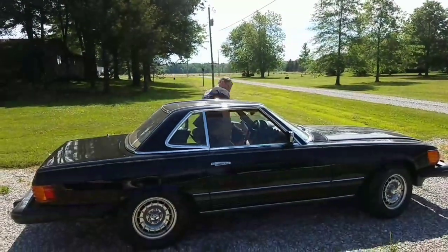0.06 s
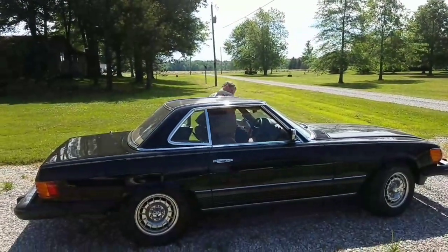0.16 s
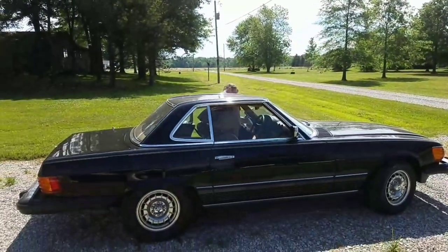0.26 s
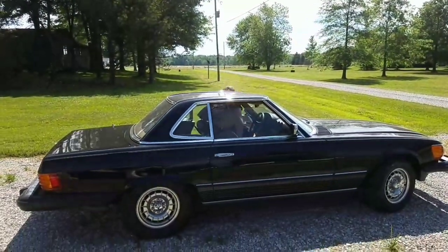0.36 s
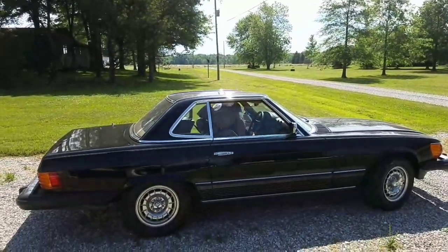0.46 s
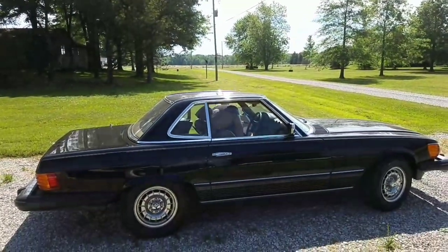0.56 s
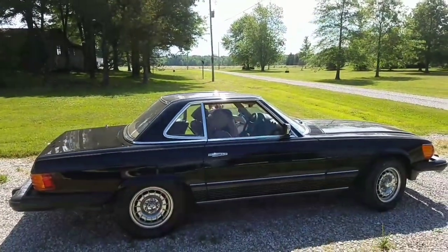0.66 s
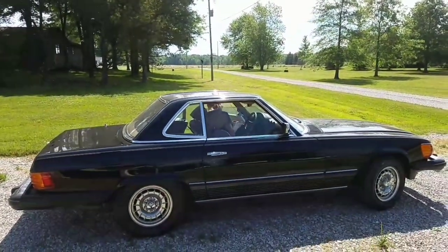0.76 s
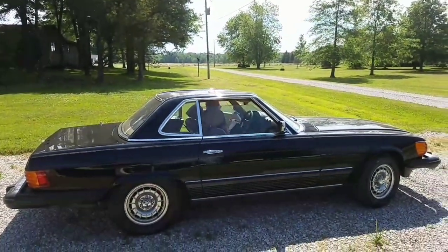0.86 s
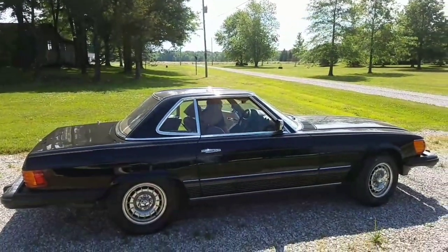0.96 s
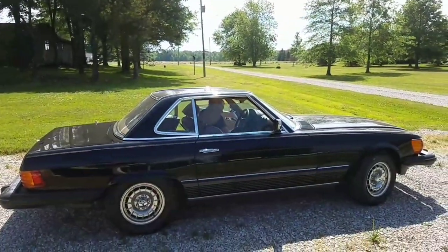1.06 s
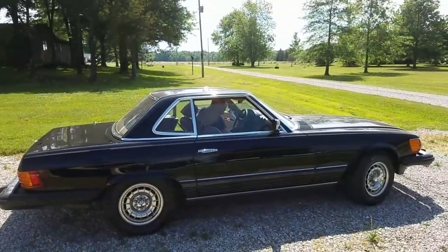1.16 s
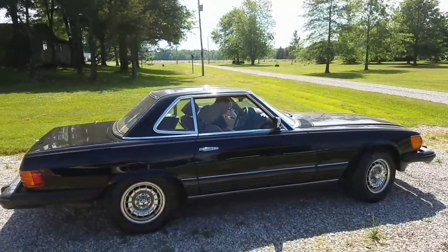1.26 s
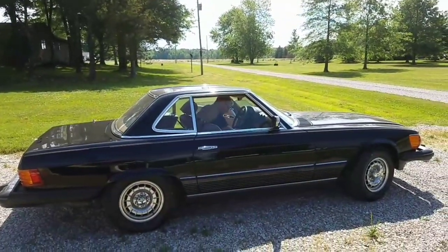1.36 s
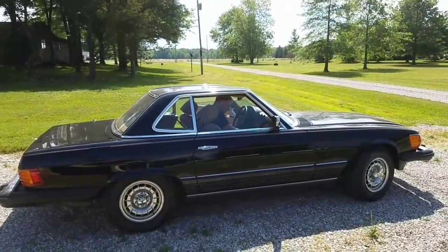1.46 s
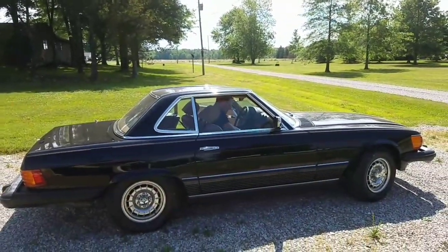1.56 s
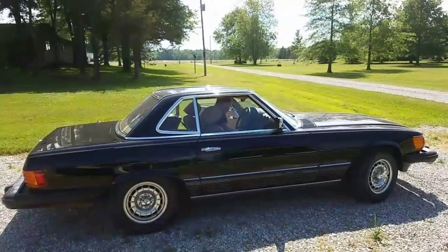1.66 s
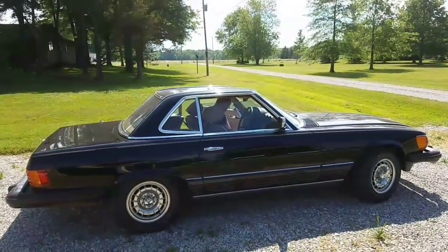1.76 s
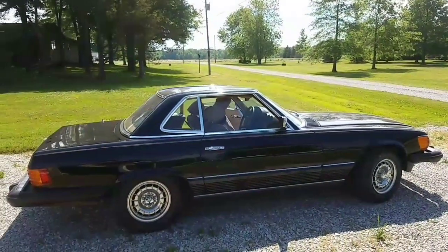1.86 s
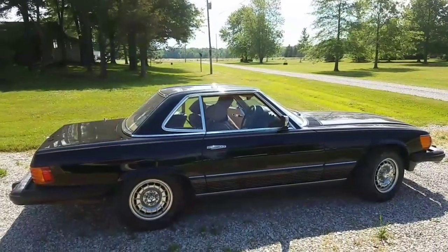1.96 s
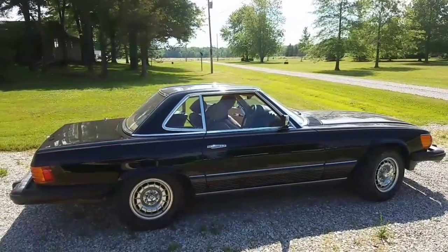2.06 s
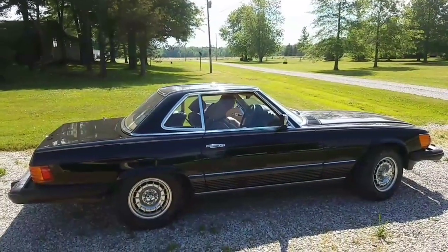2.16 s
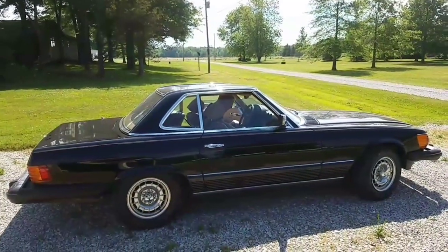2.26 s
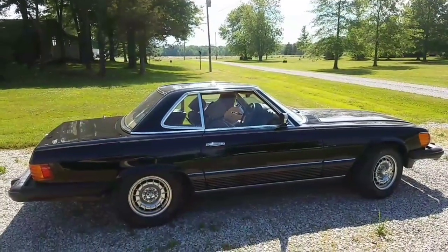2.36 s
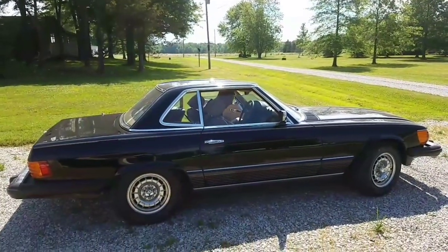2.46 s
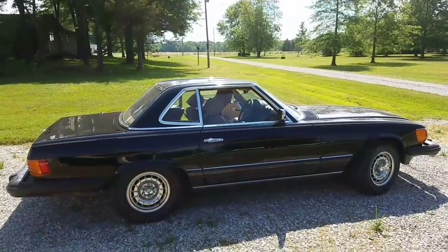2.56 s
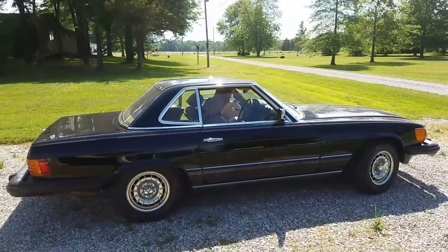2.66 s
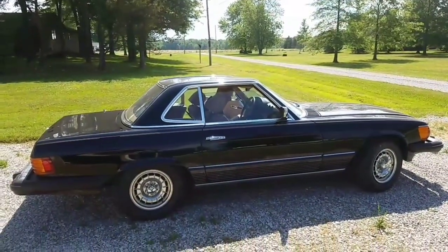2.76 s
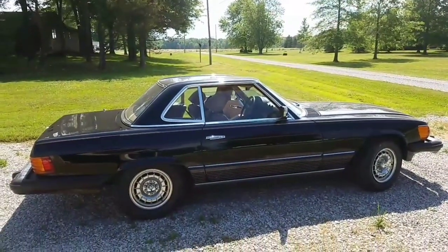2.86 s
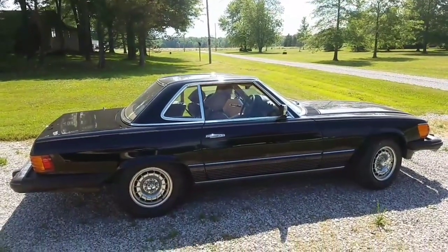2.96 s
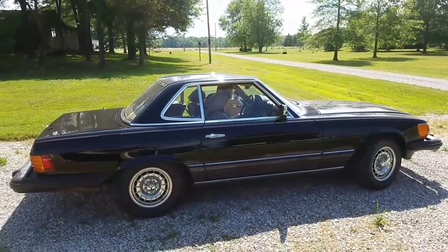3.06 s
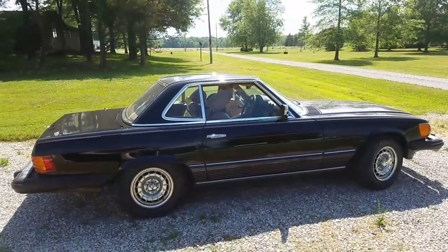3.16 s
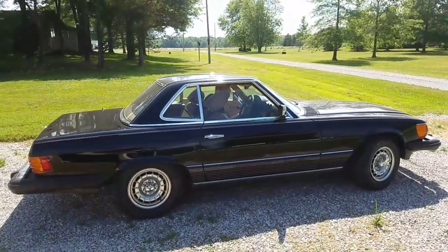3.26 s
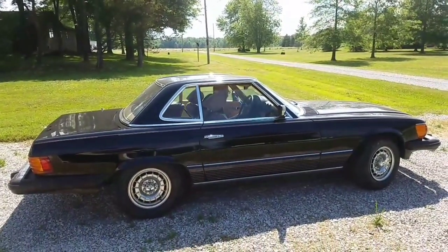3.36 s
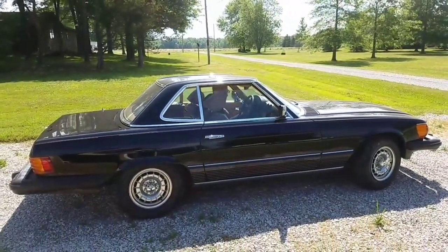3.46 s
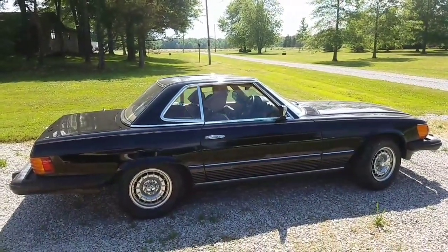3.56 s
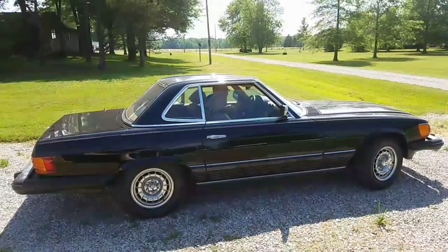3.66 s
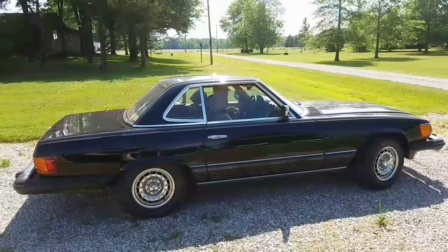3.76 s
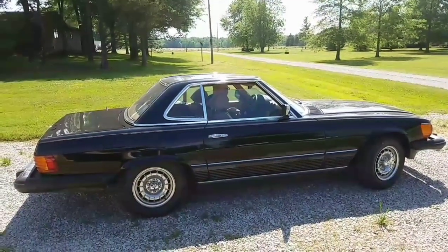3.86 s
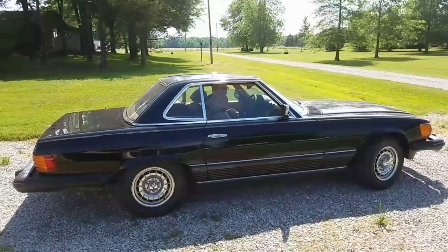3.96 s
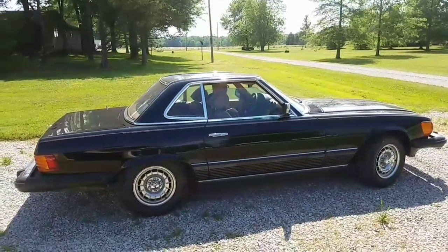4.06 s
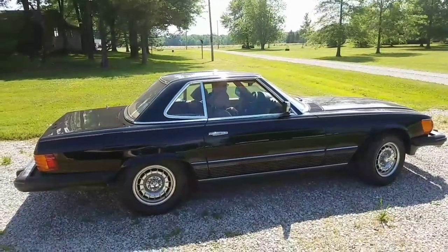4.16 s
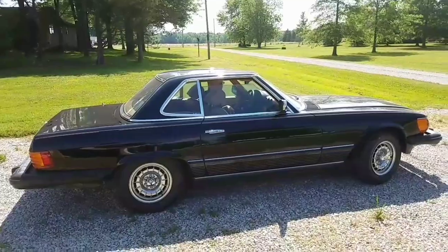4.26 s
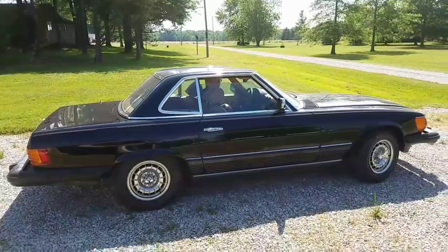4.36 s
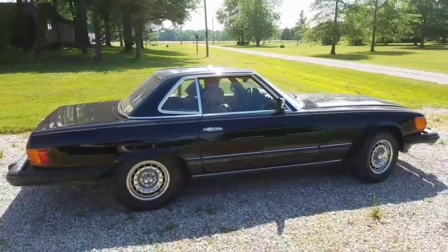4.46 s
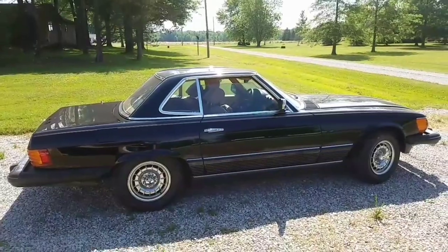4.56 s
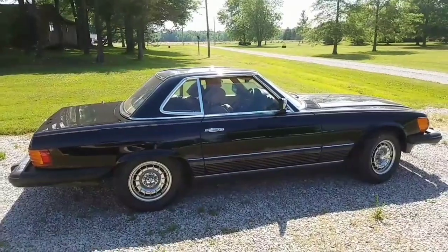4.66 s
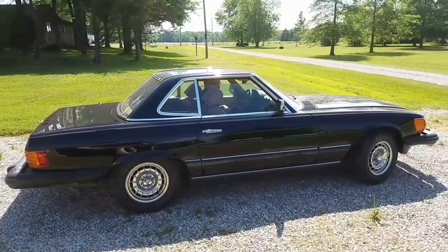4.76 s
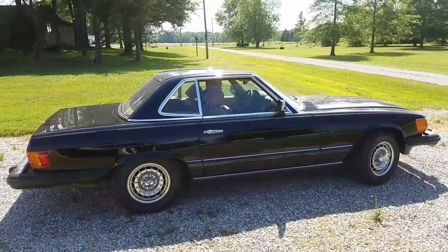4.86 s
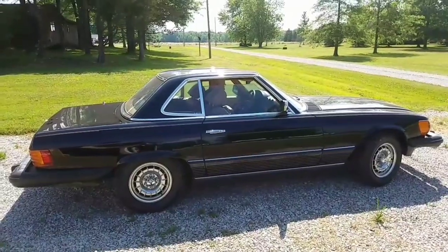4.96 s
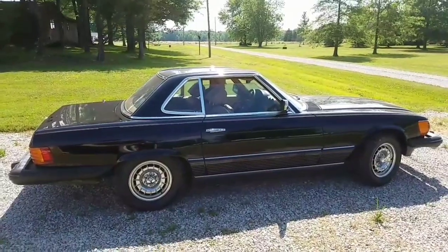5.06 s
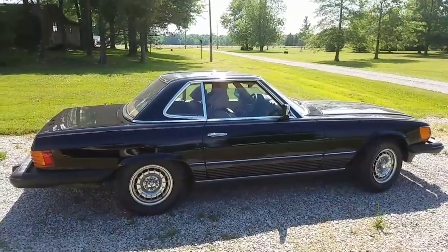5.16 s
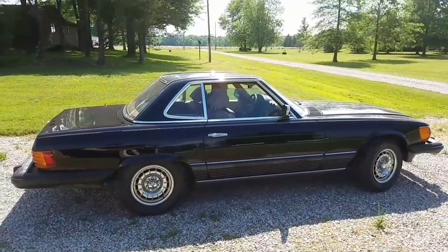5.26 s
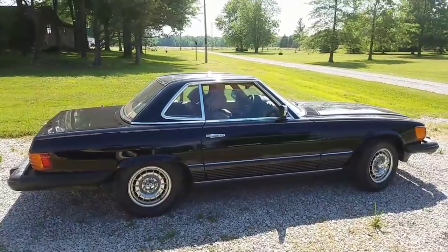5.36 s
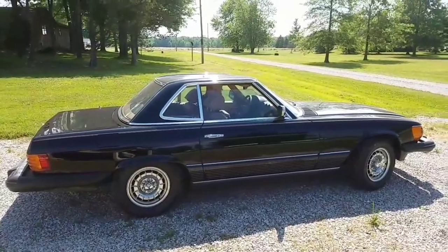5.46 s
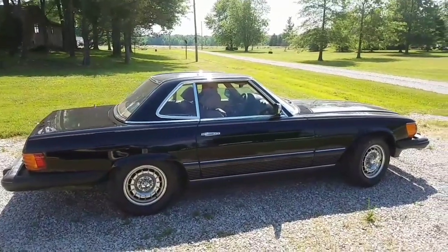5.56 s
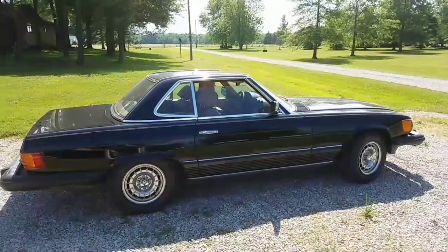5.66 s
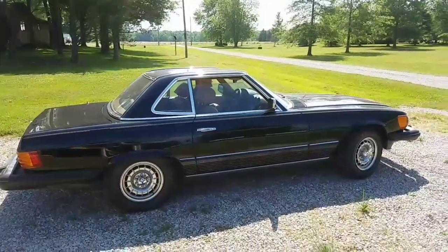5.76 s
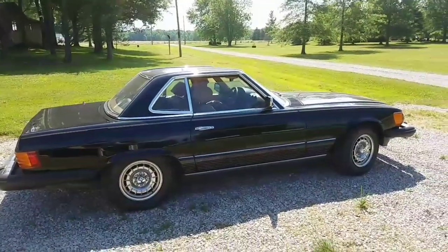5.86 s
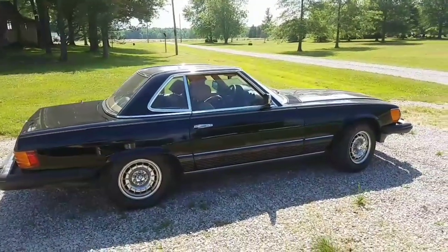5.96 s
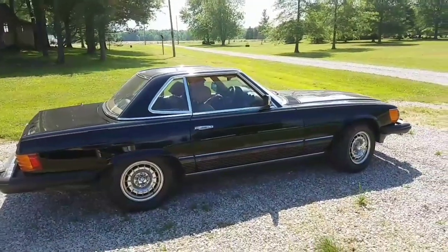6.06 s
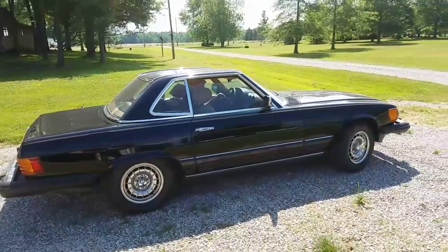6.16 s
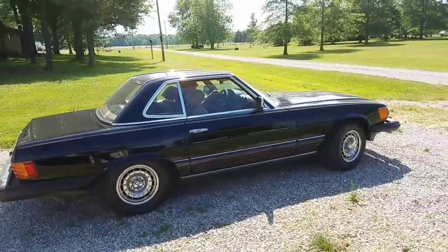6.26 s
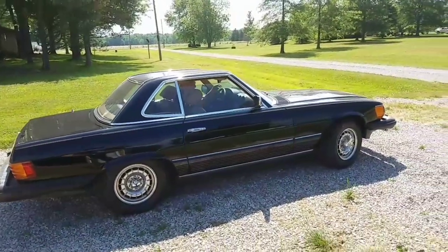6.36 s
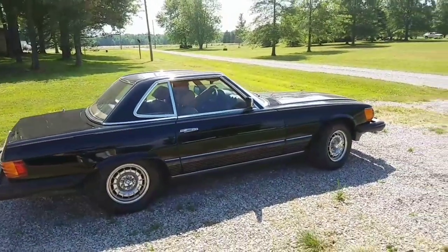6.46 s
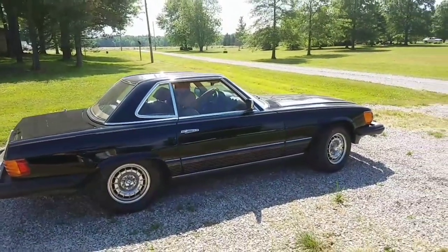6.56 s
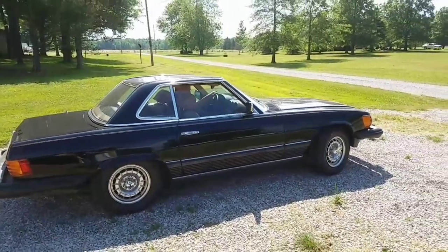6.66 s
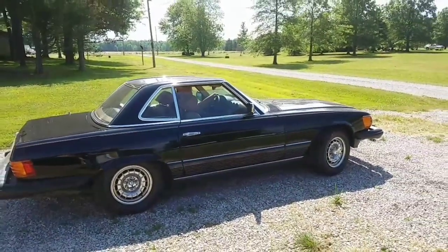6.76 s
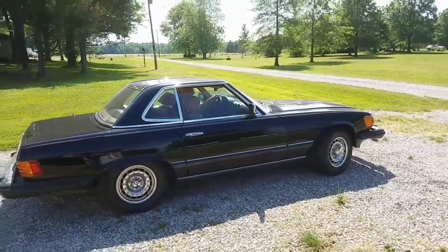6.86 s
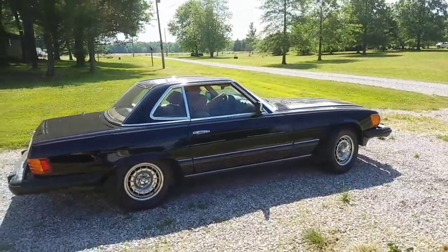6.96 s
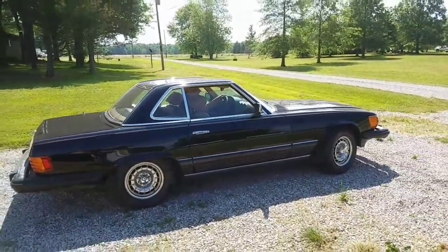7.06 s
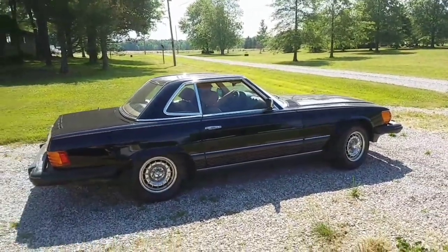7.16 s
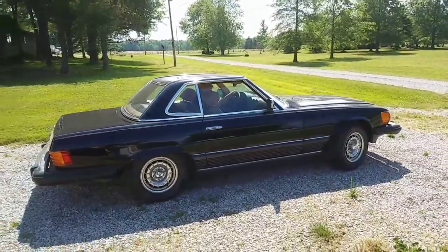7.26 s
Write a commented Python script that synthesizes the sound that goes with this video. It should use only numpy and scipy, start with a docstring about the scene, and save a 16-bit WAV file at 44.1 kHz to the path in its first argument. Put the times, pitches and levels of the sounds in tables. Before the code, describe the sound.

An eight-cylinder car idles fast with a loping burble and valve ticking; a door thuds shut, then gearing drags the idle down and the underbody clatters.

```python
"""A V8 car idles fast a few metres away: lone underbody knocks at 0.2 and 2.5 s, a low end fuller from 1.5 s,
faint squeaks from 1.9 s, a far door shut at 3.77 s, a gear dragging the crank down from 6.1 s, then a clatter.
Exhaust: sines at orders of the cycle rate, plus firing pulses and gas noise through filters.
Engine bay: ticking coloured noise and resonated noise. Air: coloured noise. Squeaks: wavering sines.
Door: decaying modes, rattles and latch clicks of noise. Knocks: gritty noise bursts with low thuds."""
import sys
import numpy as np
from scipy import signal
from scipy.fft import rfft, irfft
from scipy.io import wavfile
from scipy.ndimage import uniform_filter1d

SR = 44100
rng = np.random.default_rng(int(sys.argv[2]) if len(sys.argv) > 2 else 0)


def transcribe(u):
    """Save the signal u as a 16-bit wav file named by the first command-line argument.

    u: samples, shape (n,) or (channels, n), limited to [-1, 1]; the rate is SR.
    q: integer samples, one column per channel.
    """
    v = np.clip(np.atleast_2d(u).T, -1, 1)
    q = np.round(v * 32767).astype(np.int16)
    wavfile.write(sys.argv[1], SR, q)


N = 322371
TIME, FREQS = np.arange(N) / SR, np.fft.rfftfreq(N, 1 / SR)

# stereo lean of bay and hiss: (frequency [Hz], left over right [dB])
LEAN = [(300, 5.5), (800, 0.5), (1200, 6), (1650, -1.5), (2400, -13.5), (2900, -4.5), (3500, -9), (4100, 2),
        (7000, 1), (10500, -1), (12600, 8.5), (13500, -2.5), (15500, 8)]
# door landing on its seal: (time [s], level [dB])
DOOR_BLOW = (3.773, -7)


def amp(db):
    """Decibels to gain."""
    return 10 ** (np.asarray(db) / 20)


def evened(x):
    """Scales to rms 1."""
    return x / np.sqrt(np.mean(x ** 2) + 1e-20)


def curve(rows):
    """Joins (s, value) rows linearly over the whole scene."""
    return np.interp(TIME, *np.transpose(rows))


def read(points, hz=FREQS):
    """Joins (Hz, value) rows on a log-frequency axis."""
    f, value = np.transpose(points)
    return np.interp(np.log(hz + 1), np.log(f + 1), value)


def leaning(hz=FREQS):
    """Stereo lean as a dB offset for each channel."""
    return np.outer([0.5, -0.5], read(LEAN, hz))


def add(mix, s, sound):
    """Adds a sound into the mix from time s."""
    part = mix[..., round(s * SR):][..., :sound.shape[-1]]
    part += sound[..., :part.shape[-1]]


def drift(hz):
    """Smooth random curve of rms 1 that changes about hz times a second."""
    steps = signal.resample_poly(rng.standard_normal(2048), 8, 1)
    return evened(np.interp(TIME * hz * 16, np.arange(len(steps)), steps))


def noise(gain, size=N, swell=1):
    """Two-channel noise, shaped in time by swell, then coloured by gain(Hz); the channels part in the treble."""
    # (frequency [Hz], left-right correlation [-1 to 1])
    likeness = [(100, 0.9), (300, 0.98), (550, 0.7), (900, 0.85), (1200, 0.63), (1900, 0.46),
                (3800, 0.0095), (7500, -0.17), (15000, 0.057)]
    # left channel lags the right in the midrange: (frequency [Hz], lag [rad])
    left_lag = [(500, 0), (950, 0.14), (1250, 1.8), (1650, 2), (2760, 0.75), (6000, 0)]
    hz = np.fft.rfftfreq(size, 1 / SR)
    left, other = rfft(rng.standard_normal((2, size)) * swell)
    same = np.clip(read(likeness, hz), -1, 1)
    right = same * left + np.sqrt(1 - same ** 2) * other
    right = right * np.exp(1j * read(left_lag, hz))
    return irfft(np.array([left, right]) * evened(gain(hz)), size)


def ring(x, colour, size=4096):
    """Passes x through a causal minimum-phase filter with the given colour."""
    log_gain = np.log(amp(read(colour, abs(np.fft.fftfreq(size, 1 / SR)))))
    response = np.fft.ifft(np.exp(np.conj(signal.hilbert(log_gain)))).real
    return signal.oaconvolve(x, response[:size // 2])[:N]


def strike(t, rise_s, t60_s):
    """Envelope of a blow: a quick rise and a steady decay."""
    return (1 - np.exp(-t / rise_s)) * amp(-60 * t / t60_s)


def ramp(start_s, length_s):
    """Eases from 0 to 1 over length_s from start_s."""
    u = np.clip((TIME - start_s) / length_s, 0, 1)
    return u * u * (3 - 2 * u)


def before_bass_rise():
    """1 before the early rise of the bass, easing to 0 through it."""
    return 1 - ramp(1.475, 0.62)


def slowed():
    """0 to 1 as the engaging gear drags the crank down."""
    return ramp(6.1, 0.68)


def in_gear():
    """0 to 1 as the load comes on, a moment after the gear."""
    return ramp(6.31, 0.41)


def strain(half_width_s):
    """Labouring under load: a hump that peaks past the end of the scene, so only its faint onset counts."""
    return np.exp(-((TIME - 7.8) / half_width_s) ** 2)


def crank():
    """Four-stroke cycles done so far, two revolutions each: a hunting idle, less the sag in gear."""
    # (time [s], idle speed before the sag [rpm])
    idle = [(0, 935), (.8, 959), (2.5, 943), (3.1, 962), (3.8, 946.5)]
    sag_rpm, start_cycles = 286, 0.584
    rpm = curve(idle) - sag_rpm * slowed()
    return start_cycles + np.cumsum(rpm) / 120 / SR


def air(flutter_db=0.94, wander_db=-0.7):
    """A thin high hiss, likely the intake, and a low rumble of moving air, with the puff the door pushes out."""
    # (frequency [Hz], relative density [dB per Hz])
    hiss_colour = [(7000, -15), (9400, -18), (10600, -0.5), (12000, 2), (13600, 5.5), (15700, 4)]
    # (frequency [Hz], relative density [dB per Hz])
    rumble_colour = [(6, -10.5), (25, -20), (45, 6.5), (80, 2), (140, -0.5), (220, -10.5), (800, -71)]
    hiss_db, hiss_slowed_db = -56, -1.2
    rumble_db, rumble_early_db, rumble_gear_db = -40.5, -10, 4
    puff_db, puff_rise_s, puff_t60_s = -27.5, 0.03, 0.69

    hiss = evened(noise(lambda hz: amp(read(hiss_colour, hz) + leaning(hz))))
    unsteady_db = flutter_db * drift(22) + wander_db * drift(1)
    hiss_gain = amp(hiss_db + hiss_slowed_db * slowed() + unsteady_db)

    rumble = evened(noise(lambda hz: amp(read(rumble_colour, hz))))
    steady = amp(rumble_db + rumble_early_db * before_bass_rise() + rumble_gear_db * in_gear())
    since_door = np.maximum(TIME - DOOR_BLOW[0], 0)
    puff = amp(puff_db) * strike(since_door, puff_rise_s, puff_t60_s)
    return hiss * hiss_gain + rumble * (steady + puff)


def squeaks(waver_s=0.0014):
    """Brief thin tones of unsteady pitch that swell and fade."""
    # (time [s], length [s], frequency [Hz], rms pitch waver [Hz], peak level [dB])
    squeak_rows = [(1.902, 0.028, 4650, 252, -61), (4.737, 0.18, 4550, 300, -65),
                   (5.953, 0.26, 3310, 60, -52.5), (6.195, 0.55, 5060, 40, -73),
                   (7.121, 0.067, 1800, 70, -42), (7.127, 0.017, 2670, 120, -44)]
    out = np.zeros((2, N))
    for s, length_s, hz, waver_hz, db in squeak_rows:
        size = int(length_s * SR)
        waver = rng.standard_normal((2, size))
        waver = evened(uniform_filter1d(waver, int(waver_s * SR), axis=1))
        phase = 2 * np.pi * np.cumsum(hz + waver_hz * waver, axis=1) / SR
        add(out, s, amp(db) * np.hanning(size) * np.sqrt(2) * np.sin(phase))
    return out


def knocks(grain_db=2.0, rise_s=0.0015, thud_t60_s=0.12, dull_hz=3800, burst_db=-3, body_db=-3, size=12000):
    """Driveline and underbody: gritty bursts ring the underbody, rebound once and thud at low frequency."""
    # (time [s], level before burst_db [dB], thud level before body_db [dB], brightness [dB per octave])
    knock_rows = [(0.196, -29.5, -47, -4), (2.475, -27.5, -42, -4), (6.671, -31.5, -28.5, 5),
                  (6.691, -21, -34, -0.5), (6.707, -23.5, -21, -1.5), (7.006, -31.5, -33, 0.5),
                  (7.056, -28, -44, 0.5), (7.093, -28.5, -38, 2.5), (7.127, -29.5, -47, -1.5)]
    # underbody resonances: (frequency [Hz], width [Hz], relative level [dB])
    underbody = [(380, 75, 6.5), (640, 130, -1), (783, 46, 5.5), (996, 58, -1.5), (1232, 11, 10.5),
                 (1535, 38, 4), (1792, 29, 2.5), (2050, 89, -5), (2460, 80, -37), (2480, 57, -11),
                 (3290, 140, -24), (3770, 200, -21)]
    # (frequency [Hz], relative level [dB])
    thud_tones = [(148, 0), (202, 9)]
    knock_t60_s, rebound_s, rebound_db = 0.13, 0.017, -5.5

    t, out = np.arange(size) / SR, np.zeros((2, N))
    f = np.fft.rfftfreq(size, 1 / SR)
    power = 0
    for hz, width_hz, db in underbody:
        detune = (f ** 2 - hz ** 2) / (width_hz * f + 1)
        power = power + amp(db) ** 2 / (1 + detune ** 2)
    colour = np.sqrt(power) / (1 + (f / dull_hz) ** 4)
    tones = sum(amp(db) * np.sin(2 * np.pi * hz * t) for hz, db in thud_tones)
    thud = amp(body_db) * tones * strike(t, rise_s, thud_t60_s)

    for s, db, thud_db, bright_db in knock_rows:
        tilted = colour * amp(bright_db * np.log2(f + 1))
        for delay_s, change_db in ((0, 0), (rebound_s, rebound_db)):
            grain = evened(uniform_filter1d(rng.standard_normal(size), 80))
            grit = evened(amp(grain_db * grain))
            burst = noise(lambda hz: tilted, size, grit) * strike(t, rise_s, knock_t60_s)
            blow = amp(db + burst_db) * burst + amp(thud_db) * thud
            add(out, s + delay_s, amp(change_db) * blow)
    return out


def door(rise_s=0.0034, size=24000):
    """The door lands on its seal: panel and cabin modes boom, fittings rattle and the latch clicks."""
    # panel and cabin air: (frequency [Hz], level before the blow level [dB], t60 [s])
    door_modes = [(78.2, -3.5, 0.54), (116, -4, 0.28), (147.6, -0.5, 0.22), (167, -8.5, 0.22),
                  (180, 2.5, 0.29), (215, -8.5, 0.42), (319, -20, 0.48), (379, -20.5, 0.46),
                  (1000, -27, 0.2), (2090, -37, 0.42), (2170, -45, 0.2)]
    # fittings: (time [s], level [dB], t60 [s])
    rattles = [(3.766, -23, 0.07), (3.7722, -20.5, 0.29), (3.798, -23, 0.3), (3.826, -32, 0.92)]
    # (frequency [Hz], relative density [dB per Hz])
    rattle_colour = [(100, -6), (250, 7.5), (400, -5.5), (560, -11.5), (750, -9.5), (1000, -9.5),
                     (1400, -23.5), (2300, -22.5), (3500, -37), (5000, -60), (12000, -69)]
    # (time [s], level [dB], centre [Hz], Gaussian sigma [Hz], t60 [s])
    latch = [(3.7645, -26, 13040, 1680, 0.031), (3.767, -48, 4470, 1800, 0.12),
             (3.775, -48, 12900, 2400, 0.12), (3.7855, -33, 8450, 4030, 0.0048)]

    t, out = np.arange(size) / SR, np.zeros((2, N))
    body = np.zeros(size)
    for k, (hz, db, t60_s) in enumerate(door_modes):
        sign = (-1) ** k  # opposed neighbours: the boom takes a moment to build
        body += sign * amp(db) * np.sin(2 * np.pi * hz * t) * strike(t, rise_s, t60_s)
    blow_s, blow_db = DOOR_BLOW
    add(out, blow_s, amp(blow_db) * body)

    for s, db, t60_s in rattles:
        rattle = noise(lambda hz: amp(read(rattle_colour, hz)), size)
        add(out, s, amp(db) * rattle * strike(t, 0.00033, t60_s))
    for s, db, centre_hz, sigma_hz, t60_s in latch:
        click = noise(lambda hz: np.exp(-0.5 * ((hz - centre_hz) / sigma_hz) ** 2), size)
        add(out, s, amp(db) * click * strike(t, 0.00063, t60_s))
    return out


def whines():
    """Noise excites fuzzy resonances of engine and belt-driven parts; their balance shifts with settling and load."""
    # (frequency [Hz], half width of each filter pass [Hz], early [dB], settled [dB], in gear [dB],
    #  left over right [dB])
    resonances = [(1666, 29.4, -60.5, -60, -80, -21), (2017, 88, -69, -55, -64, -4),
                  (1138, 91, -80, -55.5, -64, 5), (650, 122, -45.5, -61, -69, -1),
                  (409, 49, -63, -52.5, -51.5, -4.5), (2300, 89, -53.5, -66, -67.5, -9),
                  (2667, 130, -67.5, -66, -77, -2), (6191, 25, -89, -83.5, -83.5, -1.5),
                  (9180, 110, -91, -92.5, -92.5, 17.5)]
    settled_s = 2.8
    shift, settled = ramp(6, 0.81), np.clip(TIME / settled_s, 0, 1)
    shake, out = noise(np.ones_like), np.zeros((2, N))
    for hz, half_width_hz, early_db, settled_db, gear_db, lean_db in resonances:
        free_db = early_db + settled * (settled_db - early_db)
        level_db = free_db + shift * (gear_db - free_db)
        b, a = signal.iirpeak(hz, hz / (2 * half_width_hz), SR)
        tone = evened(signal.lfilter(b, a, signal.lfilter(b, a, shake)))
        out += tone * amp(level_db) * amp(lean_db * np.array([[0.5], [-0.5]]))
    return out


def engine_bay(cycles, tick=0.3, tick_length=0.17, valve_db=4, flutter_db=0.5, ripple_db=2.5, count=16):
    """Fan and belt rush with ticks of sixteen unequal valves, coloured by many small panel resonances."""
    # (frequency [Hz], relative density [dB per Hz])
    bay_colour = [(100, -2), (400, 1), (560, -2.5), (700, -1.5), (1100, -1), (1450, -8.5), (1800, -2),
                  (2050, -8), (2350, -12.5), (2650, -7.5), (3100, -18), (3600, -16.5), (4100, -26),
                  (5500, -31), (8000, -48), (12000, -46.5)]
    bay_db, bay_slowed_db = -43.5, -2.5
    valve = cycles * count
    loudness = amp(valve_db * evened(rng.standard_normal(count)))
    decay = np.exp(-(valve % 1) / tick_length)  # length as a fraction of the valve interval
    ticks = evened(loudness[valve.astype(int) % count] * decay)

    panels = np.interp(FREQS, np.linspace(0, SR / 2, 512), rng.standard_normal(512))
    panels *= np.clip(FREQS / 2000, 0, 1)
    colour = amp(read(bay_colour) + ripple_db * panels + leaning())
    rush = noise(lambda hz: colour, swell=np.sqrt(1 + (tick * ticks) ** 2))
    return evened(rush) * amp(bay_db + bay_slowed_db * slowed() + flutter_db * drift(11))


def gathering():
    """Gain of the engine-bay sounds, which start a little soft."""
    return amp(-2 * (1 - ramp(0, 0.9)))


def firings(cycles, rough, uneven_db, puff_t60_s):
    """Each firing sends a pulse and a puff of turbulent gas down its pipe."""
    # cylinders in firing order: (strength [dB], pipe delay [s])
    cylinders = [(-4.5, 0.0023), (3.5, .0044), (2.5, 0.0058), (4, .02), (-3.5, .02), (-9, .018),
                 (3, 0.0092), (-10.5, .01)]
    pulses = np.zeros(N)
    for k, (db, delay_s) in enumerate(cylinders):
        delayed = np.interp(TIME - delay_s, TIME, cycles)
        turn = np.floor(delayed - k / len(cylinders))
        pulses += np.diff(turn, prepend=turn[0]) * amp(db + uneven_db * rng.standard_normal(N))
    puffs = signal.lfilter([1], [1, -amp(-60 / puff_t60_s / SR)], pulses)
    gas = puffs * rng.standard_normal(N)
    return evened(pulses) + rough * evened(gas)


def boom_level():
    """Gain of boom and drone: it follows the early rise of the bass and drops a little in gear."""
    full_db, early_db, gear_db, strain_db = -25.5, -12, -2.5, -4
    change_db = early_db * before_bass_rise() + gear_db * in_gear() + strain_db * strain(0.1)
    return amp(full_db + change_db)


def burble(cycles, drone_db=-12.5):
    """The firings drone in the silencer, at a level tied to the boom, and rasp at the tailpipe."""
    # (frequency [Hz], relative gain [dB])
    silencer = [(60, -41.5), (115, -25), (150, -0.5), (185, 2), (207, 3.5), (235, 4.5), (280, 2),
                (350, -3.5), (430, -16), (700, -33.5), (2000, -73)]
    # (frequency [Hz], relative gain [dB])
    rasp_colour = [(100, -32.5), (190, -9), (250, 4), (330, 5.5), (410, -3.5), (480, -4), (560, -13.5),
                   (680, -9), (850, -22.5), (1200, -25.5), (3000, -53.5)]
    rasp_db, rasp_gear_db, rasp_strain_db = -42, 1.5, 5
    drone = ring(firings(cycles, rough=1.0, uneven_db=-1.5, puff_t60_s=0.15), silencer)
    rasp = ring(firings(cycles, rough=2.03, uneven_db=2.0, puff_t60_s=0.31), rasp_colour)
    rasp_gain = amp(rasp_db + rasp_gear_db * in_gear() + rasp_strain_db * strain(0.25))
    return evened(drone) * boom_level() * amp(drone_db) + evened(rasp) * rasp_gain


def boom(cycles, waver_db=1.1):
    """Uneven firing of the two banks gives a cluster of low orders whose beating is the lope."""
    # (multiple of the cycle rate, running free [dB], in gear [dB]), both before the boom level
    orders = [(4, -26, -48), (5, -36, -55), (6, -20, -33), (7, -17, -28), (8, -3, -6), (9, -5, -20),
              (10, -14, -32), (11, -13, -12), (12, -22, -18), (13, -9, -3), (14, -33, -20), (15, -26, -14),
              (16, -21, -12), (17, -46, -17), (18, -41, -22), (19, -34, -21)]
    load, out = in_gear(), np.zeros(N)
    for order, free_db, gear_db in orders:
        k = round(order)
        level = (1 - load) * amp(free_db) + load * amp(gear_db)
        level = level * amp(waver_db * drift(7.4))
        out += level * np.cos(2 * np.pi * k * cycles - k ** 2)  # the pipe delays higher orders more
    return np.sqrt(2) * out * boom_level()


def scene():
    """The exhaust is alike in both channels; the brighter sounds are spread."""
    cycles = crank()
    bay = (engine_bay(cycles) + whines()) * gathering()
    exhaust = burble(cycles) + boom(cycles)
    return air() + squeaks() + knocks() + door() + bay + exhaust


def record(dry):
    """A 3 ms fade at the end and a lowpass band limit."""
    edge_hz, fade_s = 15800, 0.003
    ending = ramp(0, fade_s)[::-1]
    lowpass = signal.firwin(701, edge_hz, window=("kaiser", 9), fs=SR)
    return signal.oaconvolve(dry * ending, lowpass[None], "same")


dry = scene()
out = record(dry)
transcribe(out)
```